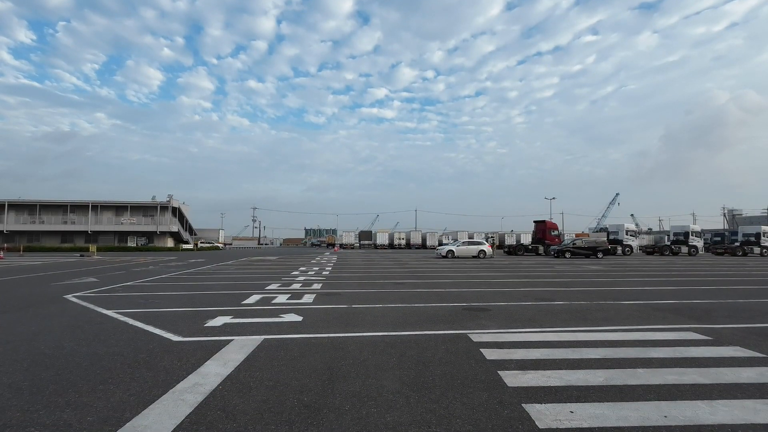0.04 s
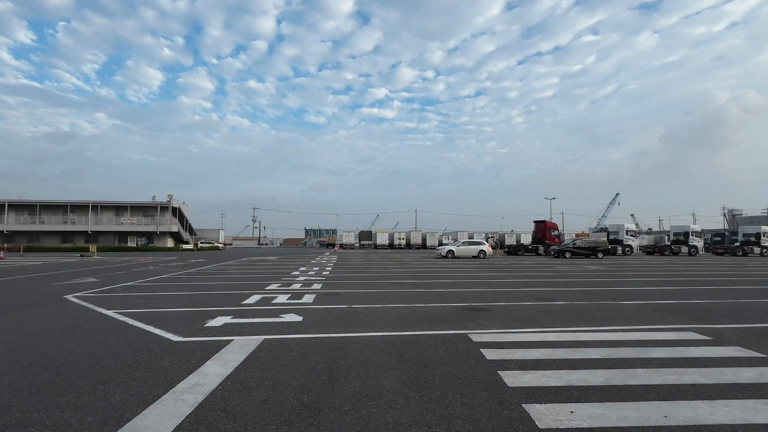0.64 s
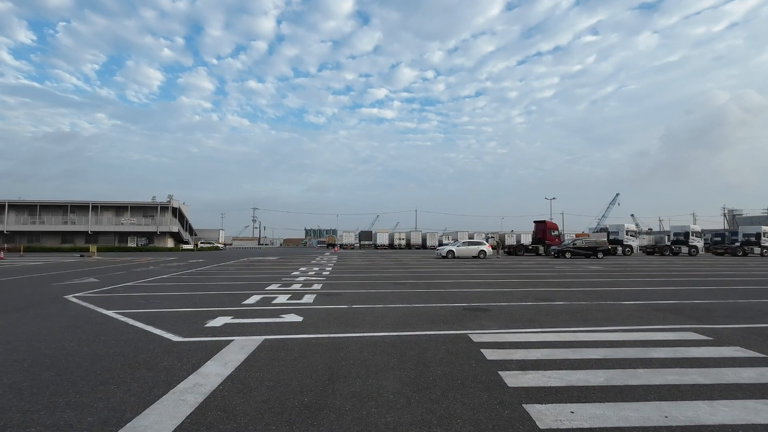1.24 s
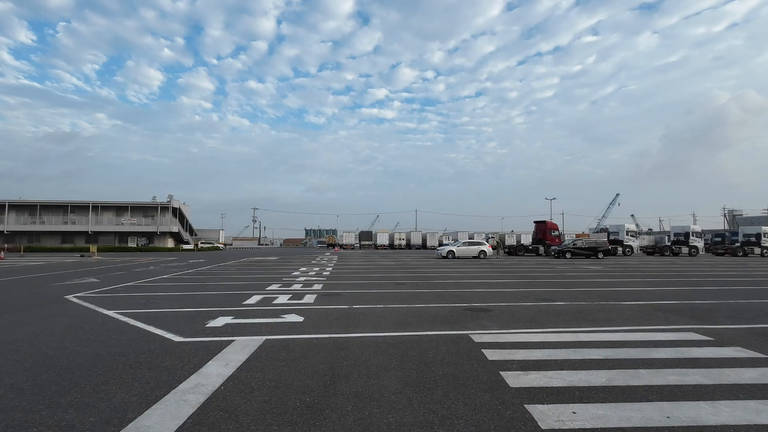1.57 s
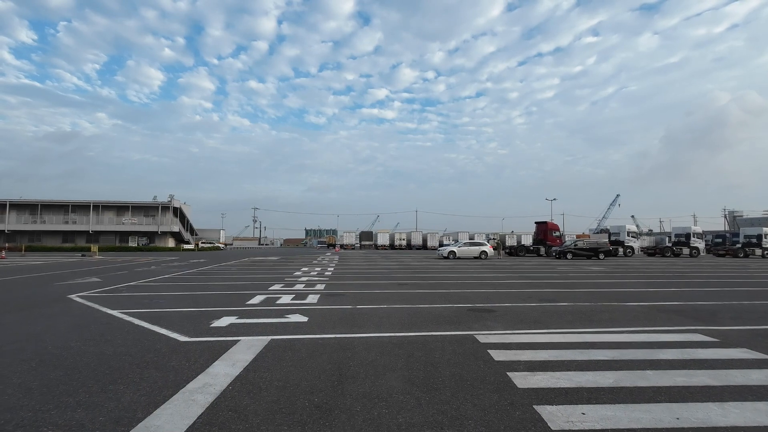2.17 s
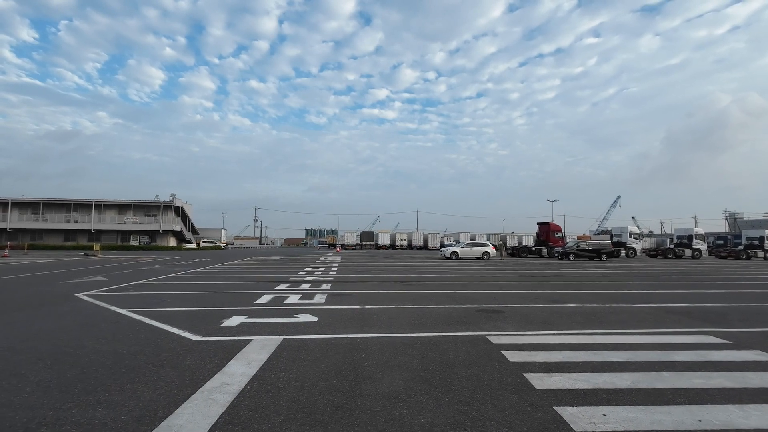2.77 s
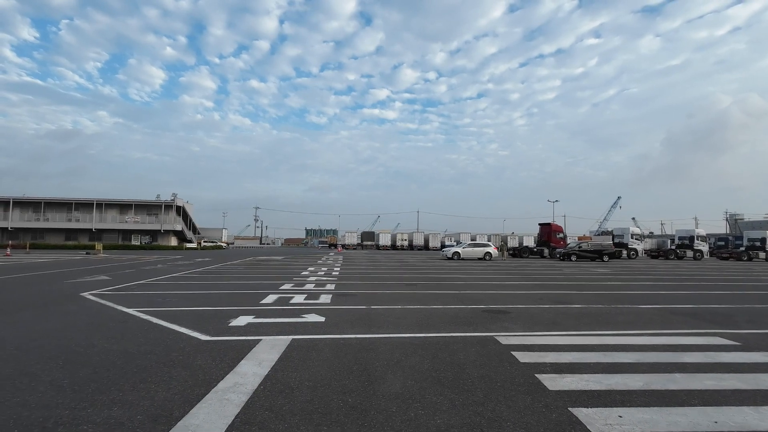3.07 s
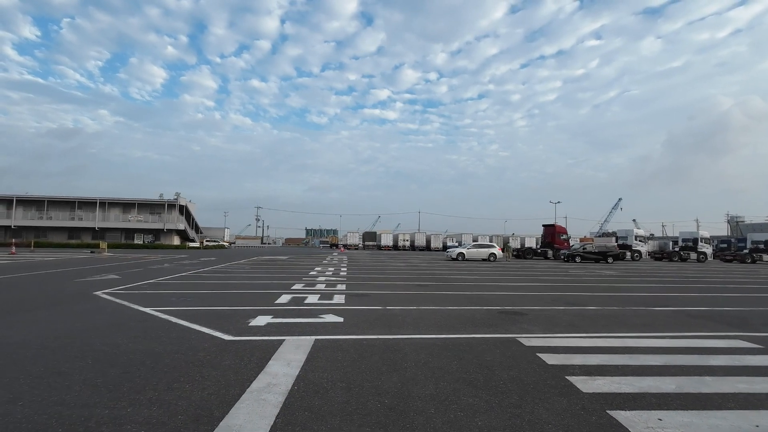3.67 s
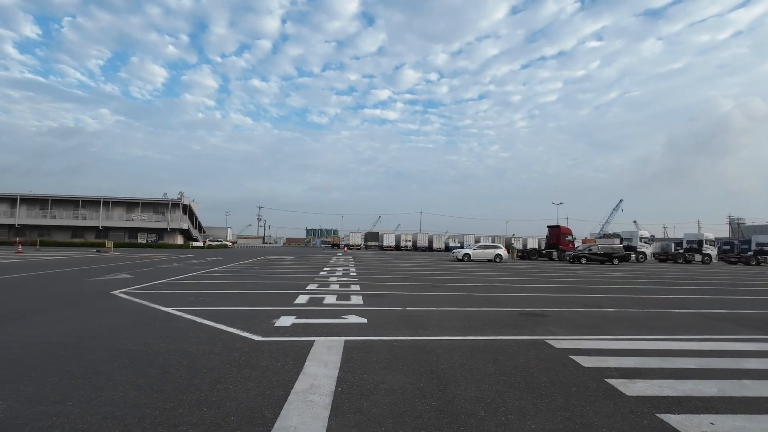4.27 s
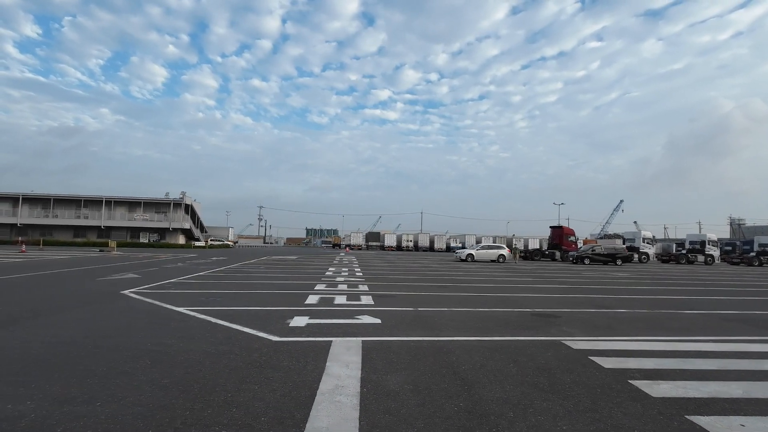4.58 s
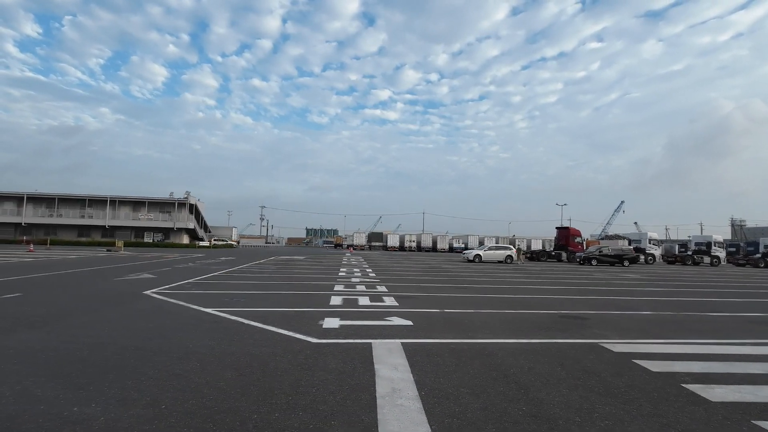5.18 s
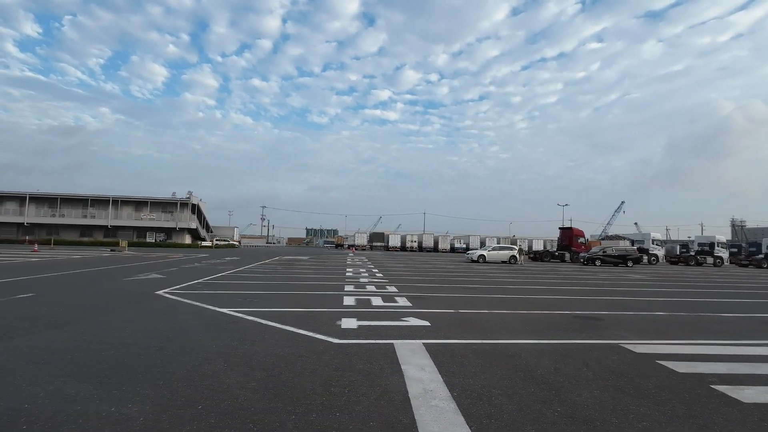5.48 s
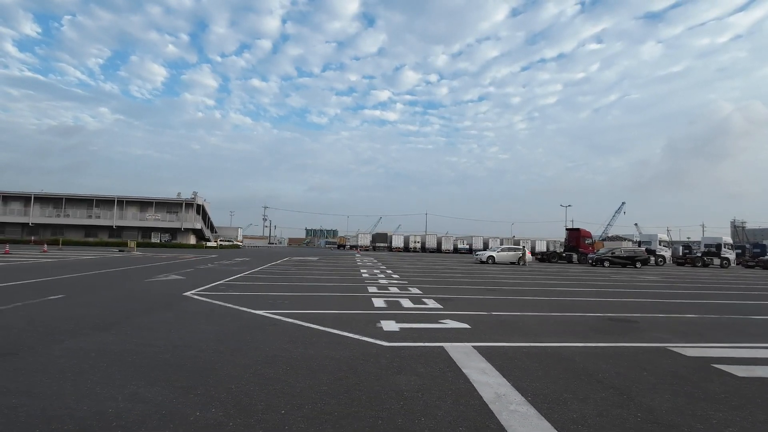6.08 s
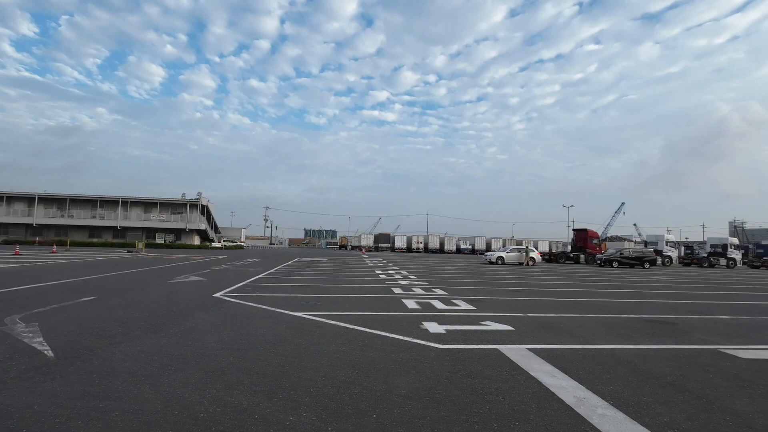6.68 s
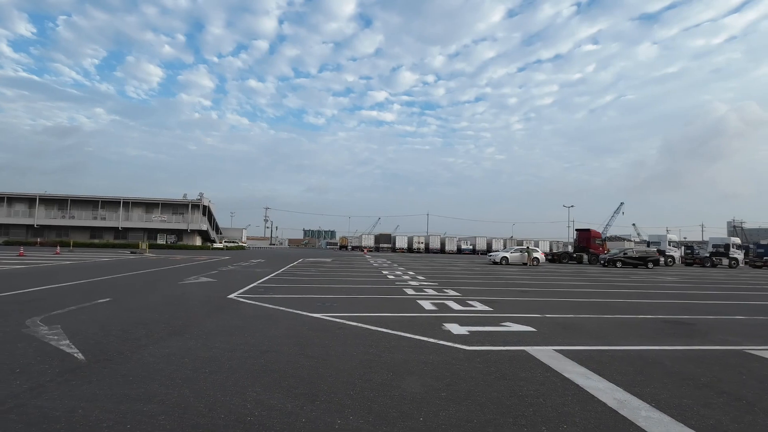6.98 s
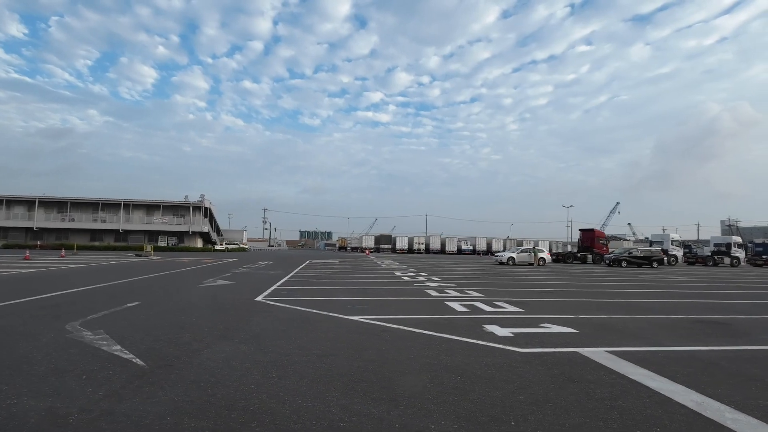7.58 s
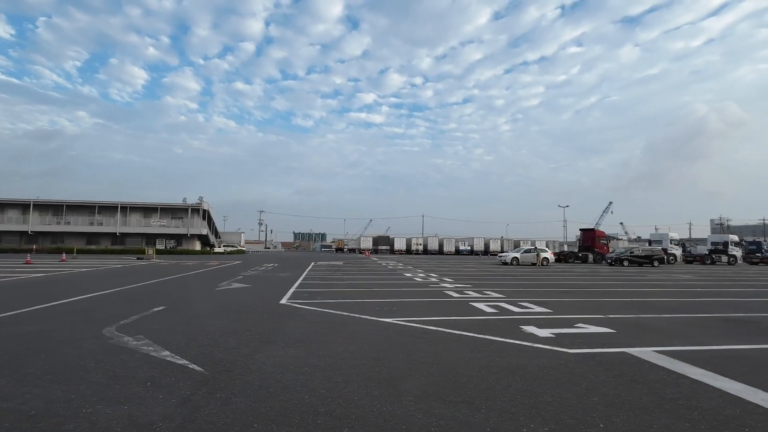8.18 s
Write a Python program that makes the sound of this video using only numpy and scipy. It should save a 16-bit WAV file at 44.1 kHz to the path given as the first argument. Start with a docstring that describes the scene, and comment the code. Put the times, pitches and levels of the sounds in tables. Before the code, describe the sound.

A diesel engine is heard from inside a bus, idling with a low throb and clatter. Ventilation rushes steadily throughout, with a very faint high electronic whistle. A small click comes just before 1 second, and trim rustles faintly near 2 seconds.

From about 2.3 seconds the engine takes load as the bus creeps off. The cabin booms and body panels drone, strongest from 3 to 4.3 seconds, while the low rumble grows a little. The engine then sags to a lower pitch. Loose fittings click and rattle between 4.2 and 5.7 seconds, sharpest just after 5 seconds, with a few tiny creaks up to 6 seconds.

Around 6.3 seconds the engine picks up again, with a shorter boom near 7 seconds and two faint ticks. It rises slightly once more near 8 seconds and is still running at the end.

```python
"""A six-cylinder diesel, heard from inside a bus that creeps off across a yard.
The engine idles, pulls briefly so that the cabin booms, sags and picks up again. Its firings make
low tones and a clatter, and set the body panels droning. Loose fittings click and rattle, and trim
creaks. Behind it all, ventilation rushes steadily and some electronics whistle very faintly."""
import sys
import numpy as np
from scipy import signal
from scipy.fft import rfft, irfft, next_fast_len
from scipy.io import wavfile
from scipy.ndimage import map_coordinates

SR = 44100
rng = np.random.default_rng(int(sys.argv[2]) if len(sys.argv) > 2 else 0)


def generate_wav(sig):
    """Save sig (samples, or channels by samples) to the path in sys.argv[1] as 16-bit PCM at SR."""
    pcm = np.round(np.clip(np.atleast_2d(sig).T, -1, 1) * 32767).astype(np.int16)
    wavfile.write(sys.argv[1], SR, pcm)


N = 367353

# Engine speed: time_s, firings_per_s
ENGINE_SPEED = [(0, 32.4), (1.2, 32.4), (1.5, 30.5), (2.1, 30.9), (2.35, 31.8), (2.8, 31.4), (3.45, 32.55),
                (4.0, 33.0), (4.28, 32.4), (4.62, 29.4), (5.4, 29.4), (5.75, 28.9), (6.3, 31.4),
                (6.7, 31.5), (6.9, 32.7), (7.1, 32.3), (7.28, 31.3), (7.62, 31.3), (7.8, 33.2),
                (8.05, 33.6), (8.33, 32.9)]
# Presses of the accelerator: start_s, rise_s, let_go_s, load_0_to_1, boom_swell_db
PEDAL_PRESSES = [(2.23, .1, 2.38, 0.3, 8.5), (2.62, 0.2, 2.9, 0.4, 11.5), (2.87, 0.18, 3.23, 0.4, 20.5),
                 (3.25, 0.18, 4.29, 0.94, 23), (4.3, .1, 4.43, 0.3, 10.5), (6.35, .2, 7.6, 0.16, 7),
                 (6.67, .1, 6.79, .35, 17.5), (6.86, 0.067, 7.13, 0.45, 14), (7.37, .15, 7.62, 0, 6)]
# Throb of the firings, before weak tones are turned down: time_s, level_db
THROB_LEVEL = [(0.0, -35), (1.2, -35.5), (1.76, -44), (1.86, -34.5), (2.2, -35.5), (2.8, -37.5),
               (3.3, -45.5), (4.1, -35), (4.8, -41.5), (5.55, -41.5), (5.9, -37.5), (6.3, -34),
               (7.0, -33.5), (7.5, -37), (7.72, -33.5), (8.1, -33), (8.33, -36.5)]
# Exhaust tones: multiple_of_three_cylinder_pulse_rate, relative_db
EXHAUST_TONES = [(1, -16.5), (3, 1), (4, -2.5), (5, -4.5), (6, -2), (7, -8.5), (9, -18.5), (10, -18.5),
                 (11, -10.5), (12, -10.5), (13, -15.5), (14, -9.5)]
# How the exhaust follows the engine: idle_db, db_per_extra_firing_per_s, full_load_extra_db
EXHAUST_RESPONSE = (-42, -0.48, 13.6)
# Hum of the engine block: multiple_of_crank_speed, relative_db
BLOCK_TONES = [(4, -5), (5, -8.5), (6, -0.5), (7.5, -8), (8.5, -8.5), (9, -11), (10, -10.5), (11, -9.5),
               (12, -11), (16.5, -7), (18, -6.5), (26.5, -12.5), (33, -11.5), (41, -10.5), (42, -11.5),
               (54, -16.5)]
# How that hum follows the engine: idle_db, db_per_extra_firing_per_s, full_load_extra_db
BLOCK_RESPONSE = (-44.5, 1, 0.64)
# Tones at 14 and 15 times the crank speed: time_s, lower_tone_db, upper_tone_db
BEATING_LEVELS = [(0, -45, -43.5), (1.2, -49.5, -47), (1.5, -48.5, -54), (2.15, -46.5, -49.5),
                  (2.4, -53, -55.5), (2.8, -44.5, -48), (3.5, -44, -51.5), (3.95, -49.5, -40.5),
                  (4.3, -46.5, -56.5), (4.9, -54, -62), (5.7, -57.5, -59), (6.4, -47.5, -57),
                  (6.75, -53, -57), (6.89, -40.5, -51), (7.05, -46, -54), (7.25, -54, -53),
                  (7.62, -53, -59), (7.77, -41.5, -50), (8.05, -41, -51.5), (8.33, -48, -59)]
# Clatter of the burning fuel: time_s, level_db
CLATTER_LEVEL = [(0, -46), (2.4, -46.5), (2.85, -45.5), (3.08, -43.5), (3.5, -42.5), (3.8, -43.5),
                 (4.3, -44), (4.55, -47), (5.4, -47), (6.0, -45.2), (6.5, -45), (6.9, -43.5), (7.15, -42),
                 (7.35, -46.5), (7.8, -44.5), (8.33, -45.5)]
# Its tone colour: pitch_hz, relative_db
CLATTER_COLOUR = [(110, -32), (170, -4), (215, -0.5), (255, -4.5), (290, -3), (330, -2), (450, -0.5),
                  (560, -1.5), (620, -7.5), (690, -9), (1000, -13.5), (1500, -24), (2200, -32.5),
                  (5000, -95)]
# Hard, bright edge of the diesel knock: time_s, level_db
KNOCK_EDGE_LEVEL = [(0, -60.5), (0.85, -56), (2.5, -60), (3.1, -57.5), (3.35, -62.5), (3.57, -54),
                    (3.8, -57.5), (4.28, -58.5), (4.55, -63), (6.45, -59), (6.7, -53), (7.2, -61.5),
                    (7.7, -59.5), (7.94, -52), (8.15, -61)]
# Its tone colour: pitch_hz, relative_db
KNOCK_EDGE_COLOUR = [(400, -29), (750, -1.5), (1100, 0.5), (1500, -2), (2000, -9), (3000, -32), (5000, -69)]
# Droning body panels: multiple_of_firing_rate, relative_db
PANEL_TONES = [(2.5, 3), (3, -2.5), (7, -7.5), (9, -10), (9.5, -13.5), (10, -10.5)]
# Single panels flaring up: start_s, length_s, multiple_of_firing_rate, level_db
PANEL_FLARES = [(2.262, .62, 2.5, -43), (2.284, .7, 7, -53), (2.92, .3, 3, -38), (2.976, 0.3, 9, -48.5),
                (3.042, 0.27, 5.5, -41), (4.271, .2, 2.5, -35.5), (4.563, 0.17, 5.5, -42.5),
                (5.803, .34, 5.5, -48), (6.722, 0.26, 4.25, -42), (6.843, 0.34, 7, -48.5),
                (7.982, .4, 4, -42.5)]
# Loose fittings: start_s, knock_db, knock_tilt_db_per_octave, tick_db, left_minus_right_db, ring_s
FITTING_CLICKS = [(0.8365, -57, -6, -72.5, 0, 0.36), (0.8744, -65, -3, -79, 4, .2),
                  (4.1977, -46.5, -6, -69.5, 1.5, 0.13), (4.203, -51, -6.5, -77, 3.5, 0.23),
                  (4.718, -50.5, -5.5, -62.5, 2, .12), (4.988, -51.5, -6.5, -77, 0.5, 0.14),
                  (5.1638, -51.5, 0, -60, 0, 0.14), (5.1684, -48.5, -1, -50.5, -1, .12),
                  (5.1783, -54, 3.5, -56.5, 1.5, .22), (5.236, -53, -8, -81, 2.5, .11),
                  (5.254, -62, -4, -81.5, 0, .08), (5.298, -62, -1, -75, 4, 0.14),
                  (5.453, -59, -3, -90, 1, 0.12), (5.634, -69, 2, -74.5, 7, .16),
                  (5.677, -61, -1, -70.5, 2, 0.12), (7.127, -74, 5, -68.5, 2, 0.082),
                  (7.174, -69, 3, -70, 0.5, 0.15)]
# Tone colour of a fitting's dull knock: pitch_hz, relative_db
FITTING_KNOCK_COLOUR = [(400, -17), (1200, -0.5), (2200, 1), (3200, -3.5), (4100, -2), (5500, -3),
                        (6400, -10), (7400, -5), (8600, -16), (11000, -35), (15000, -58)]
# Tone colour of its bright tick: pitch_hz, relative_db
FITTING_TICK_COLOUR = [(6000, -24.5), (9000, -10.5), (9800, -2.5), (11300, -4), (12000, -7), (13400, -8.5),
                       (15500, -8.5)]
# Where the fittings ring: pitch_hz, width_hz, boost_db
FITTING_RESONANCES = [(2670, 400, 3), (4270, 450, 0), (5870, 500, 6), (10150, 550, 6), (11050, 450, 5),
                      (12700, 400, 6.5)]
# Rubbing trim: middle_s, length_s, pitch_hz, width_as_share_of_pitch, level_db
TRIM_CREAKS = [(0.86, .07, 4200, .6, -73), (1.802, 0.2, 4380, 0.42, -71), (5.245, .022, 5500, 0.035, -70),
               (5.302, 0.022, 4050, 0.055, -62.5), (5.467, 0.046, 5000, .055, -70),
               (5.87, 0.13, 2510, 0.065, -62)]
# Tone colour of the ventilation: pitch_hz, relative_db
VENT_COLOUR = [(100, -29.5), (250, -2.5), (500, 2), (850, 2), (1130, -2.5), (1400, -1.5), (1570, -4.5),
               (1950, -6), (2200, -10), (2400, -12.5), (2700, -16.5), (3500, -43.5), (6000, -93.5)]
# Tone colour of the thin hiss: pitch_hz, relative_db
HISS_COLOUR = [(1500, -24), (2700, -1.5), (3100, -0.5), (3500, 0), (4500, -7), (5700, -6.5), (6800, -14.5),
               (8000, -14), (8800, -19), (9800, -20), (11300, -17), (13000, -26.5), (15500, -23)]
# Tone colour of the shaking body: pitch_hz, relative_db
RUMBLE_COLOUR = [(8, -7), (18, 3.5), (30, -1.5), (55, -0.5), (72, 1.5), (95, -4.5), (165, -4.5), (240, -19),
                 (400, -42), (1200, -100)]
# Tones of the electronics: pitch_hz, relative_db
WHISTLE_TONES = [(9989, -13), (15674.5, -13), (15734, 0), (15747.5, -5)]
# Volume shared by those tones: time_s, gain_db
WHISTLE_GAIN = [(0, -85), (1.0, -91), (1.3, -82), (2.8, -84), (3.2, -87.5), (5.5, -85.5), (5.85, -82),
                (6.55, -83), (6.8, -84), (7.85, -87.5), (8.33, -83)]
# Where the cabin and its ducts ring: pitch_hz, width_hz, boost_db
CABIN_RESONANCES = [(281, 22, 3), (657.6, 14, 5), (730, 9.6, 6), (1076.6, 23, 6.5), (1210, 45, 3.5),
                    (1313, 40, 4.5), (1457, 34, 5.5), (1672, 73, 4), (2020, 100, 3.5), (3500, 120, 2.5)]
# How alike left and right are (1 the same, -1 opposite): pitch_hz, likeness
STEREO_LIKENESS = [(30, 0.82), (65, 0.89), (130, 1), (260, 0.83), (500, 0.85), (1100, 0.94), (1900, 0.98),
                   (2600, 0.67), (3400, 0.32), (4300, 0.76), (5600, -0.43), (7200, -.1), (8800, -0.83),
                   (11300, -0.05), (14000, -.5)]
# Which side of the cabin is louder: pitch_hz, left_minus_right_db
STEREO_BALANCE = [(32, -4), (60, 2.5), (140, -0.4), (210, 0), (330, 4), (550, 1), (700, 3), (950, 0),
                  (1600, -0.8), (2500, 0), (3450, 5.5), (4500, 2), (5700, 5.5), (7000, -4.5), (9500, 1),
                  (12500, -4)]

TIME_S = np.arange(N) / SR


def engine_tones(firings):
    """The firings throb, the block and exhaust hum, and under load the cabin booms and panels drone."""
    throb_db, boom_db = curves(THROB_LEVEL)[0] + 0.58, boom_level()
    exhaust_db, block_db = follow_engine(EXHAUST_RESPONSE), follow_engine(BLOCK_RESPONSE)
    throb = sink(throb_db, below_db=-47) * tones(firings, [(0.99, 0)], waver_db=0.5, spread=0.1)
    # The exhaust tone at four times the firing rate is the one that booms in the cabin.
    boom = sink(boom_db, below_db=-51.5) * tones(firings, [(4, 0)], waver_db=0.8, spread=0.02)
    exhaust = sink(exhaust_db, below_db=-42.5) * tones(firings / 2, EXHAUST_TONES, 1.5, spread=0.21)
    # The crank turns once for every three firings.
    block = gain(block_db) * tones(firings / 3, BLOCK_TONES, waver_db=2, spread=0.17)
    drone_db = np.minimum(boom_db, -37) - 5.5  # panels can only swing so far
    drone = gain(drone_db) * tones(firings, PANEL_TONES, waver_db=3.5, spread=0.47)
    return throb + boom + exhaust + block + drone


def follow_engine(response, idle_firings_per_s=32):
    """A level in dB that follows engine speed and load; the load climbs steadily with each press."""
    idle_db, speed_db, load_db = response
    loads = [depth * ramp(start_s, rise_s) * pedal_held(let_go_s)
             for start_s, rise_s, let_go_s, depth, _ in PEDAL_PRESSES]
    extra_speed = curves(ENGINE_SPEED)[0] - idle_firings_per_s
    return idle_db + speed_db * extra_speed + load_db * np.max(loads, axis=0)


def boom_level(idle_db=-48, build_s=0.069):
    """The cabin boom in dB: it swells early in each press and levels off."""
    swells_db = []
    for start_s, _, let_go_s, _, swell_db in PEDAL_PRESSES:
        built = 1 - np.exp(-np.maximum(TIME_S - start_s, 0) / build_s)
        swells_db.append(swell_db * built * pedal_held(let_go_s))
    return idle_db + np.max(swells_db, axis=0)


def pedal_held(let_go_s, release_s=0.13):
    """1 until the accelerator is let go, then a quick fall to 0."""
    return 1 - ramp(let_go_s, release_s)


def running_hum(firings, cabin_hz=133.2, width_hz=2.9, multiple=4.5):
    """Two close engine tones beat near 155 Hz; at low revs a deeper one makes the cabin ring."""
    lower_db, upper_db = curves(BEATING_LEVELS)
    lower = gain(lower_db) * tones(firings / 3, [(14, 0)], waver_db=1.2, spread=0.1)
    upper = gain(upper_db) * tones(firings / 3, [(15, 0)], waver_db=1.2, spread=0.1)
    off_pitch = (multiple * curves(ENGINE_SPEED)[0] - cabin_hz) / width_hz
    ring_gain = gain(-45.5) / (1 + off_pitch ** 2)
    return lower + upper + ring_gain * tones(firings, [(multiple, 0)], waver_db=1.5, spread=0.05)


def diesel_clatter(firings):
    """Burning fuel clatters in the cylinders; hard combustion adds a brighter, more pulsing edge."""
    body_db, edge_db = curves(CLATTER_LEVEL)[0] + 0.7 * wobble(16), curves(KNOCK_EDGE_LEVEL)[0]
    body = in_cabin(cylinder_knocks(firings, pulsing=0.049), CLATTER_COLOUR)
    edge = in_cabin(cylinder_knocks(firings, pulsing=0.3), KNOCK_EDGE_COLOUR)
    return gain(body_db) * body + gain(edge_db) * edge


def cylinder_knocks(firings, pulsing, repeat_share=0.53, size=8192):
    """Each cylinder knocks in its own way, so part of the noise repeats every six firings."""
    place_in_cycle = (firings / 6 % 1) * size
    pattern = np.array([np.interp(place_in_cycle, np.arange(size), side) for side in noise(size)])
    knocks = np.sqrt(repeat_share) * normalise(pattern) + np.sqrt(1 - repeat_share) * noise()
    return knocks * (1 + pulsing * np.cos(2 * np.pi * firings))


def panel_flares(firings, fade_s=0.053):
    """A body panel catches one engine tone, drones roughly and lets go."""
    out = np.zeros((2, N))
    for start_s, length_s, multiple, db in PANEL_FLARES:
        swell = np.clip(np.minimum(TIME_S - start_s, start_s + length_s - TIME_S) / fade_s, 0, 1)
        rough_gain = gain(db + 1.9 * wobble(24))
        out += rough_gain * swell * tones(firings, [(multiple, 0)], waver_db=1, spread=0.15)
    return out


def loose_fittings(rise_s=0.0008, snap_db=5, snap_s=0.0015):
    """Each fitting rings with a dull knock and a bright tick: a snap, then a smear off the walls."""
    out, t = np.zeros((2, N + SR)), np.arange(SR // 3) / SR
    attack = (1 - np.exp(-t / rise_s)) * gain(snap_db * np.exp(-t / snap_s))
    for start_s, knock_db, tilt, tick_db, pan_db, ring_s in FITTING_CLICKS:
        knock_colour = [(hz, db + tilt * np.log2(hz)) for hz, db in FITTING_KNOCK_COLOUR]
        knock = in_cabin(noise(len(t)), knock_colour, FITTING_RESONANCES)
        tick = in_cabin(noise(len(t)), FITTING_TICK_COLOUR, FITTING_RESONANCES)
        knock *= gain(knock_db - 60 * t / ring_s)
        tick *= gain(tick_db - 60 * t / (0.99 * ring_s))
        first = round(start_s * SR)
        out[:, first:first + len(t)] += pan(pan_db) * (knock + pan(-3) * tick) * attack
    return out[:, :N]


def trim_creaks():
    """Trim panels rub briefly: a narrow band of noise squeaks, a wide one rustles."""
    out = np.zeros((2, N))
    for middle_s, length_s, pitch_hz, width, db in TRIM_CREAKS:
        rub = filtered(noise(), lambda hz: (1 + 1j * (hz / pitch_hz - 1) / width) ** -2)
        out += gain(db) * normalise(rub) * bump(TIME_S, middle_s, length_s)
    return out


def ventilation(rush_db=-51.5, hiss_db=-68.5):
    """Air rushes steadily from the vents, with a thin hiss on top."""
    rush = gain(rush_db + 0.5 * wobble(13)) * in_cabin(noise(), VENT_COLOUR)
    hiss = gain(hiss_db + 0.33 * wobble(7.3)) * in_cabin(noise(), HISS_COLOUR)
    return rush + hiss


def body_rumble(base_db=-41.5, follow_share=0.51):
    """The body shakes with the engine, and more once the wheels turn."""
    rolling = ramp(start_s=2.4, rise_s=2.3)
    shake_db = follow_engine(EXHAUST_RESPONSE) + 4 * rolling
    rumble_db = base_db + follow_share * (shake_db - base_db)
    return gain(rumble_db + 2.2 * wobble(4)) * in_cabin(noise(), RUMBLE_COLOUR)


def electronics_whistle():
    """Electronics give off thin, high tones; the closest pair beats in a quick flutter."""
    side_phase = np.array([[0], [1.9]])
    whistle = sum(gain(db + 1.2 * wobble(12)) * np.sin(2 * np.pi * hz * TIME_S + side_phase)
                  for hz, db in WHISTLE_TONES)
    return gain(curves(WHISTLE_GAIN)[0]) * pan(-3) * whistle


def tones(cycles, multiples, waver_db, spread):
    """Wavering tones locked to the engine; spread shifts left and right opposite ways, in radians."""
    out = np.zeros((2, N))
    for multiple, db in multiples:
        phase = 2 * np.pi * (multiple * cycles + rng.random()) + waver_db / 8 * wobble(5)
        side_phase = spread * rng.choice([-1, 1]) * np.array([[1], [-1]])
        out += gain(db + waver_db * wobble(6)) * np.sin(phase + side_phase)
    return normalise(out)


def in_cabin(pair, colour, resonances=CABIN_RESONANCES):
    """Two unrelated noises fill the cabin: ringing, alike in the bass, apart in the treble."""
    def response(hz):
        angle = np.arccos(np.clip(at_pitch(STEREO_LIKENESS, hz), -1, 1)) / 2
        peaks_db = sum(db * bump(hz, pitch_hz, width_hz) for pitch_hz, width_hz, db in resonances)
        return gain(at_pitch(colour, hz) + peaks_db) * np.array([np.cos(angle), np.sin(angle)])
    shared, opposite = filtered(pair, response)
    return normalise(np.array([shared + opposite, shared - opposite]))


def gain(db):
    """Turn decibels into a multiplier."""
    return 10 ** (np.asarray(db) / 20)


def sink(db, below_db):
    """Like gain, but weak tones are turned down further so they sink into the rumble."""
    return gain(db) / (1 + gain(below_db - db) ** 2)


def pan(left_minus_right_db):
    """Multipliers for the left and right sides."""
    return gain(np.array([[1], [-1]]) * left_minus_right_db / 2)


def normalise(x):
    """Scale to an average strength (rms) of 1."""
    return x / np.sqrt(np.mean(x ** 2) + 1e-20)


def noise(samples=N):
    """Two unrelated white noises."""
    return rng.standard_normal((2, samples))


def ramp(start_s, rise_s):
    """A straight climb from 0 to 1."""
    return np.clip((TIME_S - start_s) / rise_s, 0, 1)


def bump(x, middle, width):
    """A bell curve of height 1."""
    return np.exp(-(2 * (x - middle) / width) ** 2)


def at_pitch(table, hz):
    """Read between a table's rows on a log pitch scale."""
    pitches_hz, values = np.transpose(table)
    return np.interp(np.log(hz + 1), np.log(pitches_hz + 1), values)


def curves(table):
    """One value per sample for each column after the time."""
    times_s, *columns = np.transpose(table)
    return [np.interp(TIME_S, times_s, column) for column in columns]


def wobble(points_per_s):
    """A smooth curve through random points."""
    steps = np.arange(0, N, 64)
    smooth = map_coordinates(rng.standard_normal(512), [steps * points_per_s / SR], mode="wrap")
    return np.interp(np.arange(N), steps, smooth)


def filtered(x, response):
    """Multiply each frequency in x by response(hz)."""
    size = x.shape[-1]
    padded = next_fast_len(size + SR // 2)
    hz = np.fft.rfftfreq(padded, 1 / SR)
    return irfft(rfft(x, padded) * response(hz), padded)[..., :size]


def scene():
    """All sources as heard behind the windscreen."""
    firings = np.cumsum(curves(ENGINE_SPEED)[0]) / SR  # how many firings so far
    engine = engine_tones(firings) + running_hum(firings) + panel_flares(firings)
    steady = engine + diesel_clatter(firings) + ventilation() + body_rumble()
    cabin = filtered(steady, lambda hz: pan(at_pitch(STEREO_BALANCE, hz)))
    return cabin + loose_fittings() + trim_creaks() + electronics_whistle()


def record(dry, top_hz=15800):
    """Soften the start and end, and cut the very highest treble."""
    fades = signal.windows.tukey(N, 0.001)
    return filtered(dry * fades, lambda hz: hz < top_hz)


dry = scene()
out = record(dry)
generate_wav(out)
```